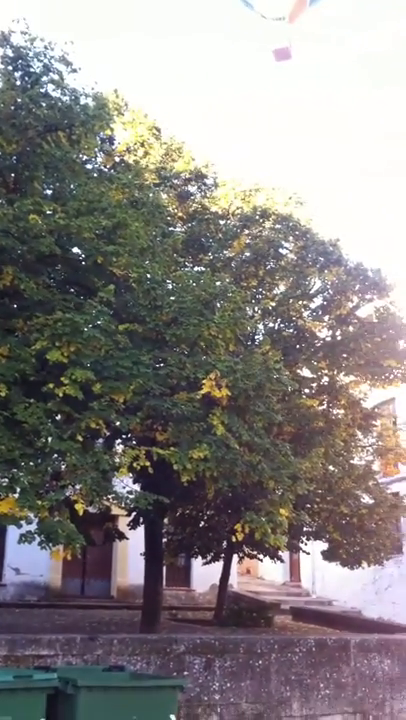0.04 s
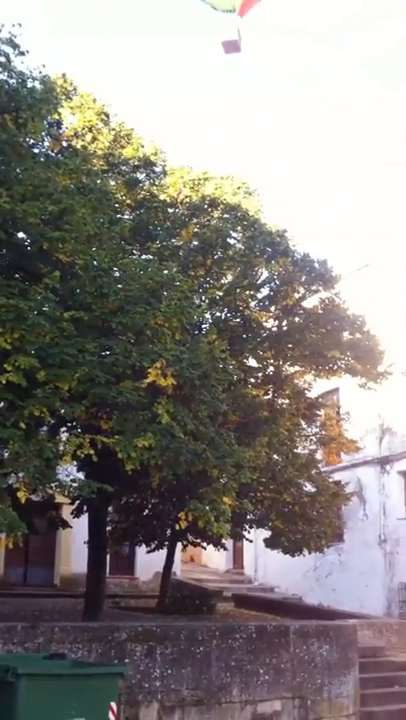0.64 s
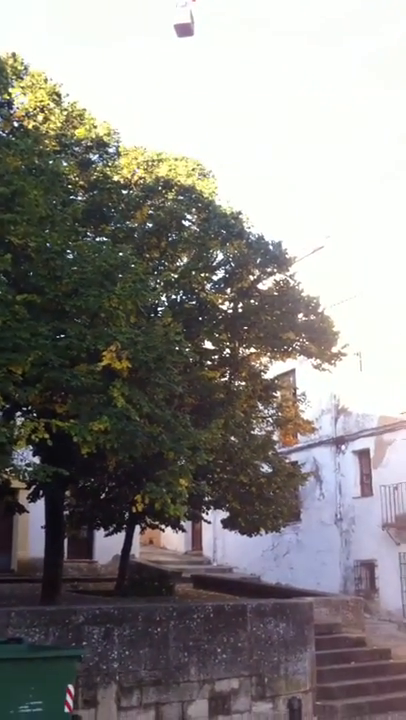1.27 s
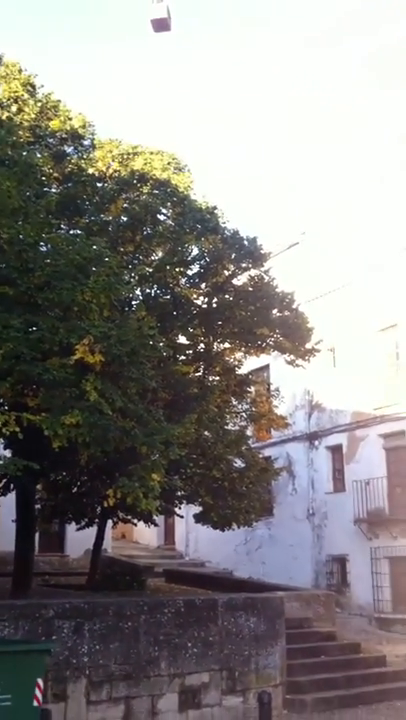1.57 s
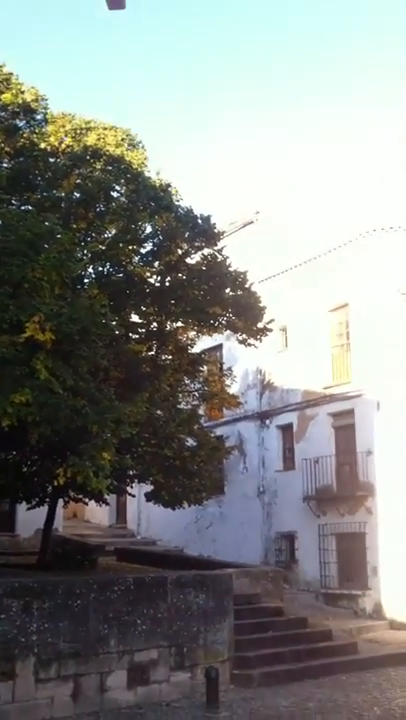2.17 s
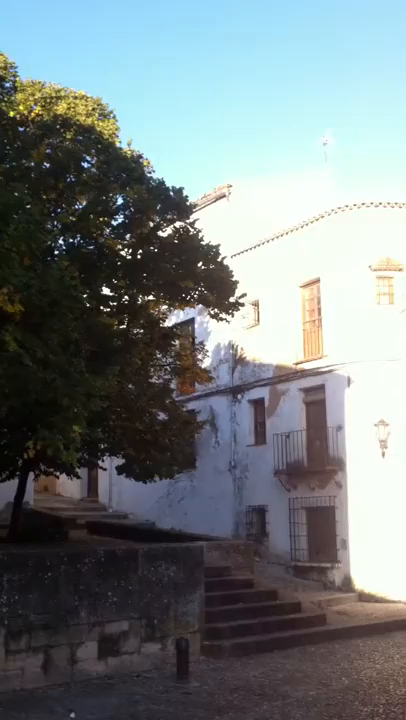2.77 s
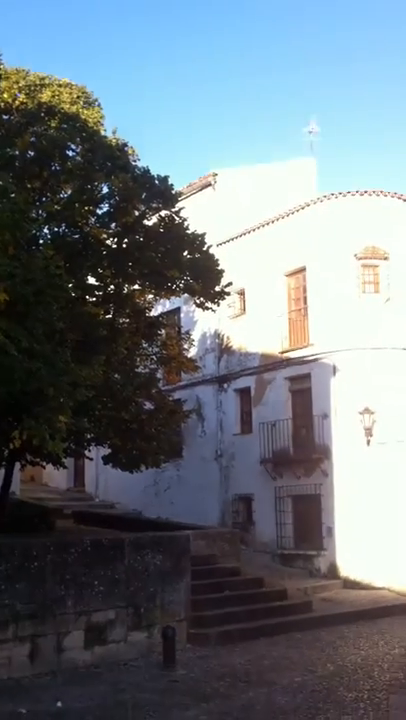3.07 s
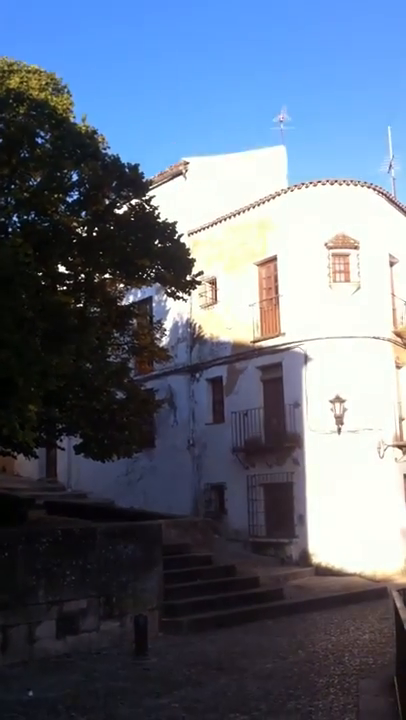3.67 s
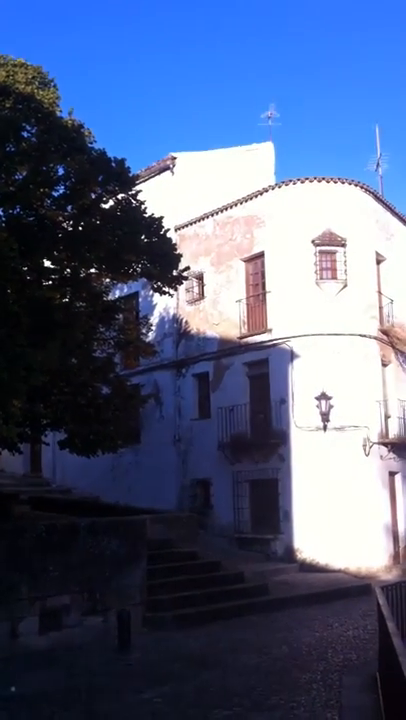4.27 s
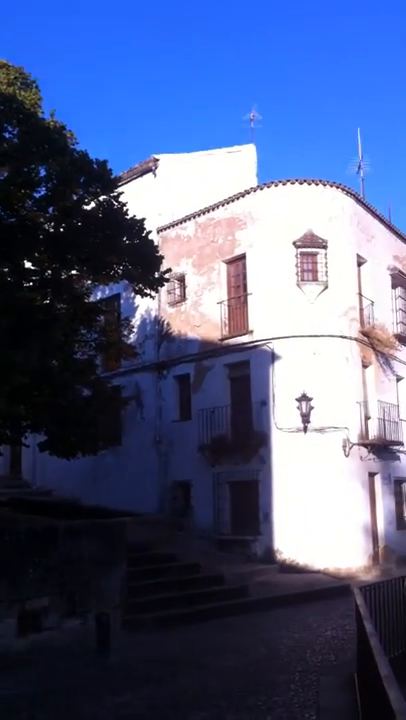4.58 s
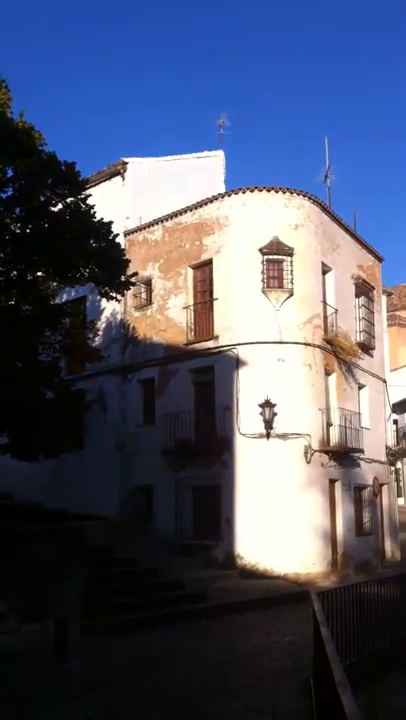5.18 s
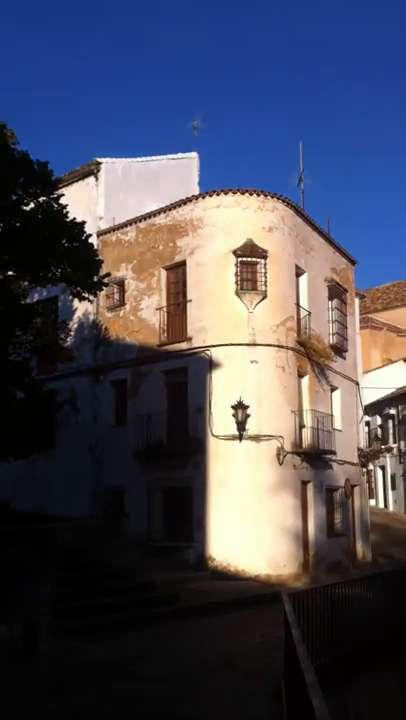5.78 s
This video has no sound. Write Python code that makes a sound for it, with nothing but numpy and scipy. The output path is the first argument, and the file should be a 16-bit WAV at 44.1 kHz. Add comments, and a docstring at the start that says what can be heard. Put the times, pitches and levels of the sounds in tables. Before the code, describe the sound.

A hot air balloon's burner roars twice over a quiet square, after faint distant traffic and light knocks.

```python
"""A quiet town murmurs, with a few soft knocks and faint chirrs; then come two hissing, roaring blasts.
They are the propane burner of a hot air balloon drifting over a stone square. The gas jet hisses,
the swirling flame roars and puffs, and the plume of hot air rumbles in the balloon's mouth.
Paving and walls add slowly shifting echoes, and a phone's own hiss lies under it all."""
import sys
import numpy as np
from scipy import signal
from scipy.fft import rfft, irfft, next_fast_len
from scipy.io import wavfile

SR = 44100
rng = np.random.default_rng(int(sys.argv[2]) if len(sys.argv) > 2 else 0)


def output_pcm(signal):
    """Save a mono or channel-first signal as 16-bit PCM at the path in sys.argv[1].

    Samples are clipped to [-1, 1] before scaling.
    """
    pcm = np.clip(np.atleast_2d(signal).T, -1, 1) * 32767
    wavfile.write(sys.argv[1], SR, np.round(pcm).astype(np.int16))


N = 261513
T = np.arange(N) / SR

# blasts of the burner (valve opens [s], time to catch [s], time to build up [s],
# time held open [s], time easing off [s], whump on lighting [dB])
BURNER_BLASTS = [(4.127, .007, 0.29, .77, 0.3, 4.5), (5.45, 0.033, 0.17, .8, .34, 0)]


def undb(db):
    """Turn decibels into a gain to multiply by."""
    return 10 ** (np.asarray(db) / 20)


def unit(x):
    """Scale to an average (rms) level of 1."""
    return x / np.sqrt(np.mean(x ** 2))


def shape(x, response):
    """Filter a sound: response gives the gain at each frequency."""
    size = next_fast_len(len(x) + SR // 2)
    hz = np.fft.rfftfreq(size, 1 / SR) + 1e-6
    return irfft(rfft(x, size) * response(hz), size)[:len(x)]


def noise(colour):
    """Noise of level 1, its tone drawn through (frequency [Hz], level [dB]) points."""
    hz, db = np.transpose(colour)
    return unit(shape(rng.standard_normal(N), lambda f: undb(np.interp(np.log(f), np.log(hz), db))))


def dull(x, edge_hz):
    """Gently soften the treble."""
    return shape(x, lambda f: 1 / np.sqrt(1 + (f / edge_hz) ** 2))


def wander(rate):
    """A smooth random wobble of size 1 that changes about rate times a second."""
    return unit(shape(rng.standard_normal(N), lambda f: np.exp(-(f / rate) ** 2)))


def ramp(start, length):
    """Rise from 0 to 1 over length seconds."""
    return np.clip((T - start) / length, 0, 1)


def hump(time, half_s):
    """Rise smoothly to 1 at the given time, then fall back."""
    return np.exp(-((T - time) / half_s) ** 2 / 2)


def swell(time, half_s, db, hz, width_hz):
    """A short swell of noise around one pitch."""
    band = unit(shape(rng.standard_normal(N), lambda f: np.exp(-((f - hz) / width_hz) ** 2)))
    return band * undb(db) * hump(time, half_s)


def thuds(rows, low_hz=130):
    """Each row is one swing of air pressure, out and back, with no deep bass."""
    out = np.zeros(N)
    for time, db, hz in rows:
        phase = 2 * np.pi * hz * (T - time)
        out -= undb(db) * phase * np.exp((1 - phase ** 2) / 2)
    return shape(out, lambda f: 1 / np.sqrt(1 + (low_hz / f) ** 10))


def town(stir_db=0.28, waver=0.01213, hum_swell_db=3):
    """Far traffic stirs and slowly ebbs, with faint wavering hums in it."""
    # tone of the traffic (frequency [Hz], level [dB])
    colour = [(25, -36), (50, -27), (66, -17), (78, -17), (110, -13), (150, -2), (195, 0), (300, -4),
              (420, -6.5), (560, -6), (680, -7.5), (980, -7.5), (1800, -14), (3200, -27), (8000, -40)]
    # loudness of the traffic (time [s], level [dB])
    murmur = [(0, -59.5), (1.0, -60.7), (3.4, -60.5), (4.0, -62.5), (5.93, -61)]
    # hum of distant motors (pitch [Hz], level [dB])
    hums = [(199, -78), (572, -77)]
    out = noise(colour) * undb(np.interp(T, *np.transpose(murmur)) + stir_db * wander(11.0))
    for hz, db in hums:
        pitch = hz * (1 + waver * wander(7.95))
        phase = 2 * np.pi * np.cumsum(pitch) / SR
        out += np.sqrt(2) * np.sin(phase) * undb(db + hum_swell_db * wander(1.9))
    return out


def chirrs():
    """Faint, high flutters far off."""
    # chirrs (time [s], half length [s], level [dB], pitch [Hz])
    flutters = [(0.21, 0.045, -83, 3720), (3.004, .05, -77, 3800), (3.067, .03, -77, 3500)]
    return sum(swell(*flutter, width_hz=570) for flutter in flutters)


def knocks(tick_db=-19, tick_hz=3600):
    """A tiny tick of contact comes just before each soft thud."""
    # knocks near the phone (time [s], level [dB], pitch [Hz])
    bumps = [(0.302, -55, 230), (0.726, -44.5, 280), (2.912, -50.5, 250)]
    ticks = sum(swell(time - .003, 0.00091, db + tick_db, tick_hz, width_hz=1300)
                for time, db, _ in bumps)
    return ticks + thuds(bumps)


def square_echoes(x, tail_s=0.84, tail_db=-13, tail_edge_hz=1500):
    """Near echoes slide as the balloon drifts; the house fronts add a dull, scattered tail."""
    # echoes off stone (delay at the first blast [ms], drift [ms/s], level [dB], treble edge [Hz])
    echoes = [(1.49, -0.055, -26.5, 6000), (2.0, -0.023, -20.5, 6500), (4.11, -0.028, -16, 2600),
              (6.21, -0.048, -10, 5100), (6.9, 0.0025, -19, 3000), (8.14, -.078, -19.5, 3000),
              (9.7, -0.062, -20, 4700), (13.82, -0.066, -12, 6400), (16.685, -.058, -21, 7300)]
    since_first_blast = T - BURNER_BLASTS[0][0]
    out = x.copy()
    for ms, drift, db, edge_hz in echoes:
        delay = (ms + drift * since_first_blast) / 1000
        out += undb(db) * np.interp(T - delay, T, dull(x, edge_hz))
    age = T[:SR]
    tail = rng.standard_normal(SR) * undb(-60 * age / tail_s) * (age > .018)
    scattered = signal.fftconvolve(x, tail / np.linalg.norm(tail))[:N]
    return out + undb(tail_db) * dull(scattered, tail_edge_hz)


def hollow(x):
    """The burner frame and the balloon's mouth boost some pitches and weaken others."""
    # resonances and dips (frequency [Hz], width [Hz], boost [dB])
    bands = [(188.5, 6.8, 4.5), (295, 40, 0), (361, 10, 6.5), (387, 13, 7.5), (540, 20, -3), (659, 11.5, 4),
             (906, 21, 2.5), (1050, 15, -3), (1200, 34, -6.5), (1230, 27, 8), (1327, 30, 0), (1508, 68, 4),
             (1614, 44, 6.5), (1790, 34, 3), (2120, 50, 4), (2920, 23, 2.5)]
    return unit(shape(x, lambda f: undb(
        sum(db / (1 + (2 * (f - hz) / width) ** 2) for hz, width, db in bands))))


def valve(blast, sag_db_per_s, decay_db_per_s, crest_db=1.2):
    """Gain through one blast: a gentle crest, a sag as the valve eases off, a fade once it is shut."""
    opens, catch, _, held, easing, _ = blast
    age = T - opens
    crest = crest_db * hump(opens + 0.58, half_s=0.096)
    sag = sag_db_per_s * np.clip(age - held, 0, easing)
    decay = decay_db_per_s * np.maximum(age - held - easing, 0)
    return ramp(opens, catch) * undb(crest - sag - decay)


def burning(start_db, sag_db_per_s, decay_db_per_s, whump_s=0.04):
    """Strength of the fire: any gathered gas burns off in a whump, and each blast builds up."""
    gain = 0
    for blast in BURNER_BLASTS:
        opens, _, build, _, _, whump_db = blast
        whump = whump_db * np.exp(-np.maximum(T - opens, 0) / whump_s)
        build_up = start_db * (1 - ramp(opens, build))
        gain += undb(build_up + whump) * valve(blast, sag_db_per_s, decay_db_per_s)
    return gain


def gas_jet(swirls, level_db=-51, swirl_db=0.46, rise_s=0.076):
    """The gas hisses as the jet comes up to pressure."""
    # tone of the hiss (frequency [Hz], level [dB])
    colour = [(300, -10), (900, 5.5), (1500, -5.5), (2100, -1), (2700, 1), (3300, -3.5), (4000, -0.5),
              (6000, -1.5), (9000, -5.5), (11500, -11), (15500, -17)]
    flow = 0
    for blast in BURNER_BLASTS:
        age = np.maximum(T - blast[0], 0)
        flow += (1 - np.exp(-age / rise_s)) * valve(blast, sag_db_per_s=18.5, decay_db_per_s=97)
    return hollow(noise(colour)) * flow * undb(level_db + swirl_db * swirls)


def plume(level_db=-40.5, churn_db=1.25):
    """Hot air rumbles and billows, churning on a little after the flame."""
    # tone of the rumble (frequency [Hz], level [dB])
    colour = [(25, -49), (50, -40), (85, -18.5), (100, -22), (125, -10.5), (148, -2.5), (188, 2), (220, -7),
              (300, -9), (600, -71)]
    # billows of hot air (time [s], half length [s], boost [dB])
    billows = [(4.204, .04, 3), (4.746, 0.017, 6), (5.28, .018, 7.5), (5.764, 0.015, 4.5)]
    billow_db = sum(db * hump(time, half_s) for time, half_s, db in billows)
    strength = burning(start_db=-11.5, sag_db_per_s=10, decay_db_per_s=72)
    return hollow(noise(colour)) * strength * undb(level_db + churn_db * wander(20) + billow_db)


def flame(swirls, level_db=-40, swirl_db=1.0):
    """The flame roars and puffs, shaken by swirling gas."""
    # tone of the roar (frequency [Hz], level [dB])
    colour = [(100, -45), (200, -10.5), (290, 3), (390, -4), (510, -1.5), (680, -3.5), (850, -9),
              (1200, -14), (1700, -20.5), (3000, -25.5), (8000, -45)]
    # loud puffs (time [s], level [dB], pitch [Hz])
    puffs = [(4.134, -37, 201), (4.182, -41, 192), (4.415, -25.5, 270), (4.740, -29, 200),
             (5.268, -37, 151), (5.760, -31, 184)]
    strength = burning(start_db=-12.5, sag_db_per_s=18, decay_db_per_s=92)
    roar = hollow(noise(colour)) * strength * undb(level_db + swirl_db * swirls)
    return roar + thuds(puffs)


def burner():
    """Flame, plume and jet together; the same swirls shake the flame and the jet."""
    swirls = wander(58)
    return flame(swirls) + plume() + gas_jet(swirls)


def scene():
    """The burner over the square, the town behind it."""
    return (square_echoes(burner()) + town() + chirrs() + knocks())[None]


def record(dry, hiss_db=-69.5, top_hz=15700):
    """The phone adds its own hiss and cuts the highest treble."""
    # tone of the microphone's hiss (frequency [Hz], level [dB])
    colour = [(100, -3.5), (3500, 0.5), (6500, -1.5), (9500, -2.5), (10700, -5.5), (13000, -3.5),
              (15500, -2.5)]
    treble_cut = signal.ellip(12, .1, 80, top_hz, fs=SR, output="sos")
    return signal.sosfilt(treble_cut, dry + undb(hiss_db) * noise(colour))


dry = scene()
out = record(dry)
output_pcm(out)
```